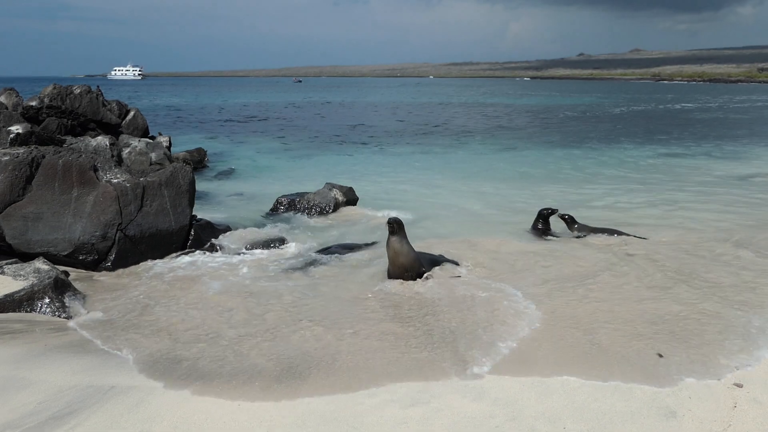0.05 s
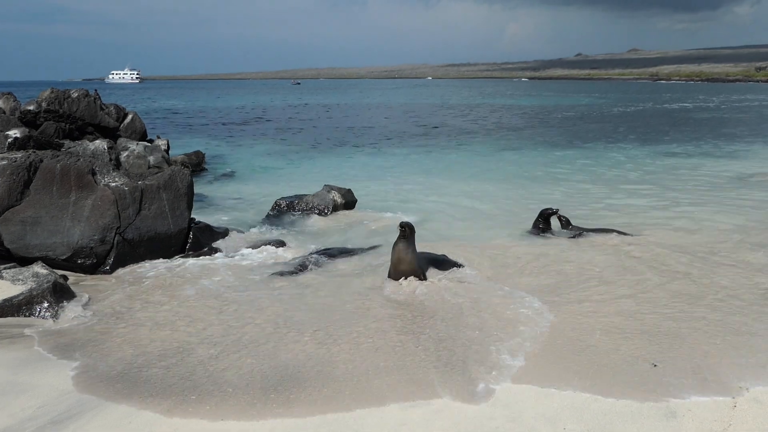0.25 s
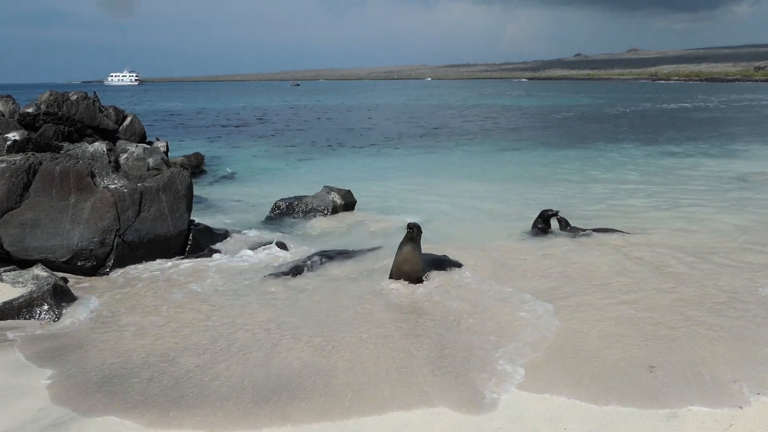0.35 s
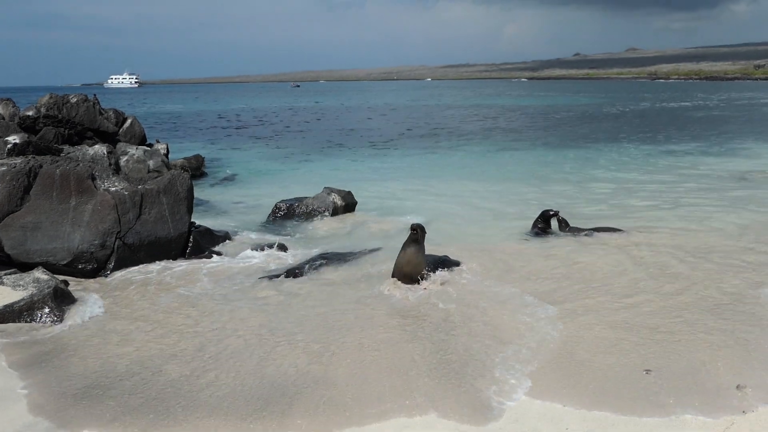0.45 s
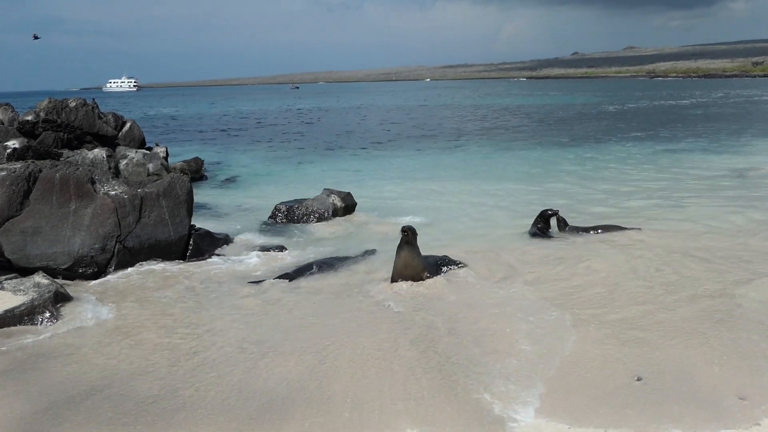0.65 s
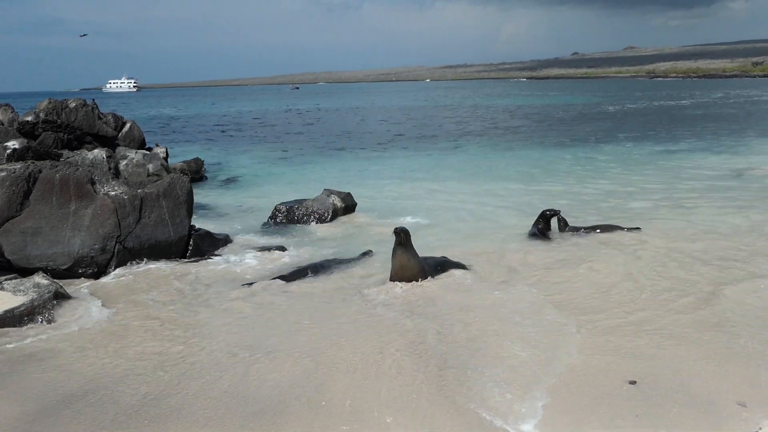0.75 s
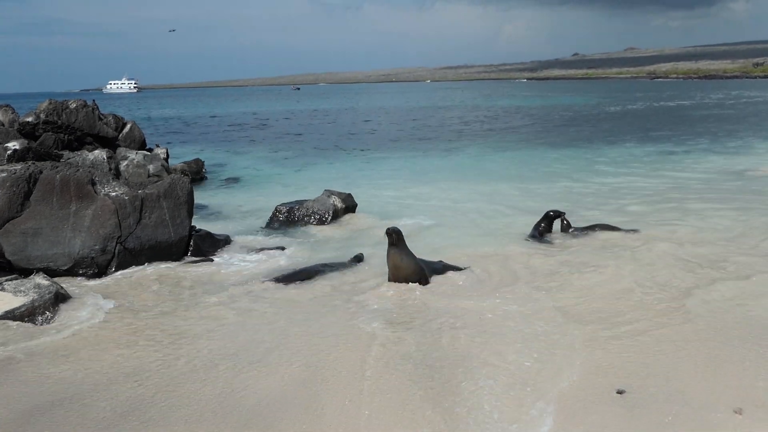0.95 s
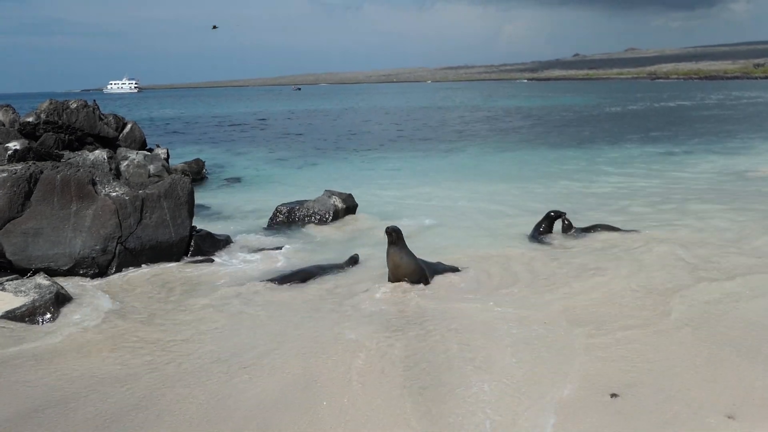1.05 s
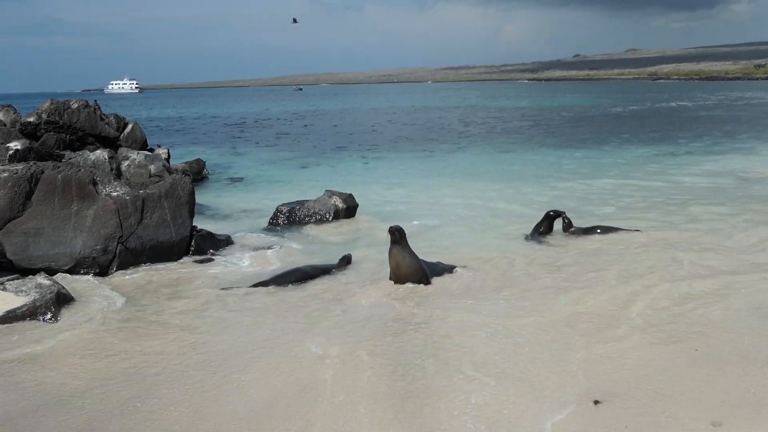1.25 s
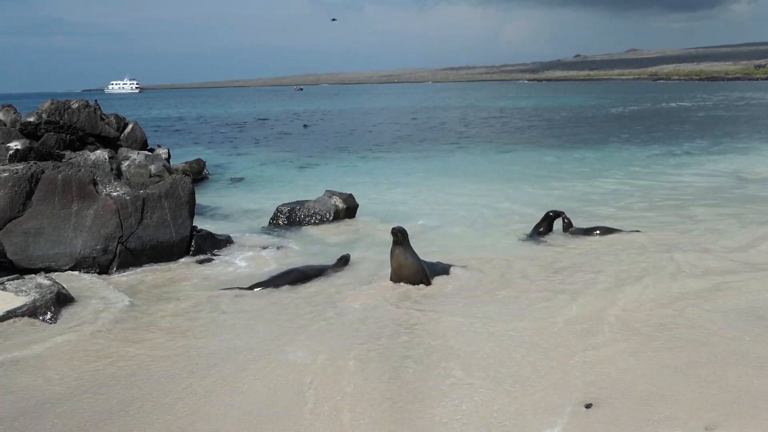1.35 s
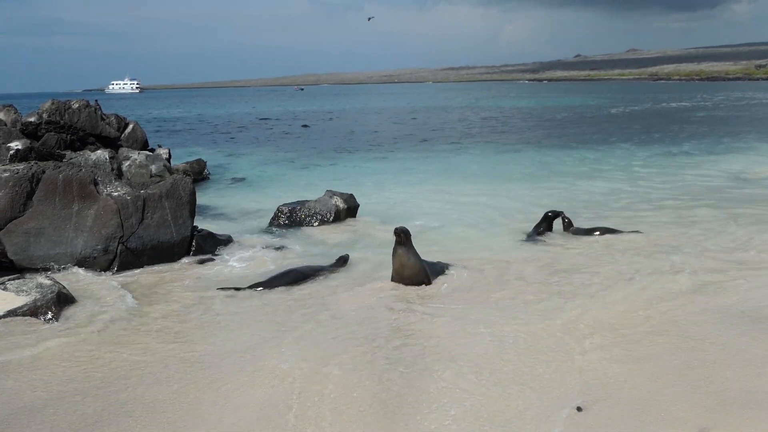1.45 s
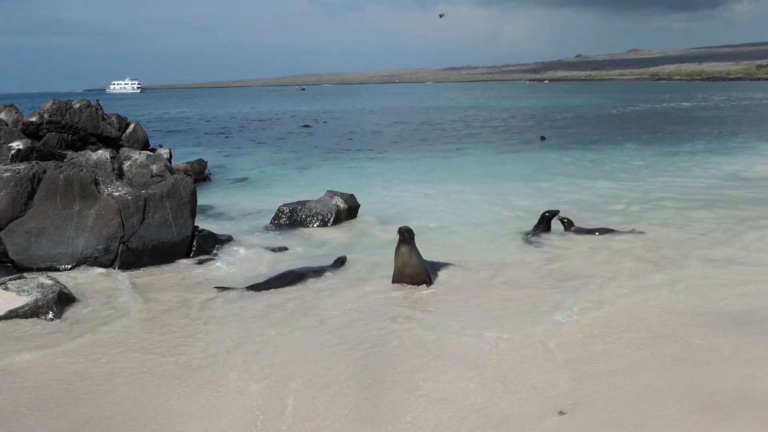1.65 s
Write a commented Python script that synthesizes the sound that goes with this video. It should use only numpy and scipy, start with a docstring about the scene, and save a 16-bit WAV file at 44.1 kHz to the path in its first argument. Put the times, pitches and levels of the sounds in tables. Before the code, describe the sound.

A sea lion growls close by, starting abruptly at about 0.2 s: low, rough, uneven throat rattling that swells into a short bark peaking near 0.7 s, sagging in pitch and ending by 0.87 s, with dull quick echoes. A faint distant moan follows until 1.15 s. Small waves wash steadily throughout; soft hollow laps come from about 0.97 to 1.4 s, with a tiny droplet chirp and thin spray hiss near 1.1 s.

```python
"""A beach, with a sea lion near a camera microphone that starts abruptly.
The animal growls, as uneven noisy slaps of its folds ring in its throat, and the growl swells into
a short bark of wavering tones that sags in pitch. A faint far moan follows; dull echoes answer the voice.
Small waves wash over the sand throughout, as flickering bands of noise. Water laps among the rocks,
one drop chirps upward and spray hisses in a narrow band."""
import sys
import numpy as np
from scipy import signal
from scipy.io import wavfile
from scipy.ndimage import uniform_filter1d

SR = 44100
rng = np.random.default_rng(int(sys.argv[2]) if len(sys.argv) > 2 else 0)


def invert_db(level):
    """Linear amplitude ratio for a level in decibels (20 dB per decade), elementwise."""
    return 10 ** (np.asarray(level, dtype=float) / 20)


def digitize_waveform(pressure):
    """Quantize a signal to 16-bit integers and store it at the path in sys.argv[1].

    Rows of a 2-D input are taken as channels; values are limited to [-1, 1].
    """
    field = np.atleast_2d(pressure).T
    bounded = np.clip(field, -1, 1)
    quanta = np.round(bounded * 32767).astype(np.int16)
    wavfile.write(sys.argv[1], SR, quanta)


N = 74970   # samples

# Growl over time: time_s, level_db, brightness_db_per_octave, chest_db (extra on the low resonances)
GROWL = [(.19, -46, 5.5, 12), (.22, -35, 0.5, -4), (.26, -40.5, 2.5, 5.5), (.32, -30.5, -3.5, -5.5),
         (.35, -42, 7, 9.5), (.42, -35.5, 0.5, 2), (.47, -31.5, 2, -3), (.51, -31.5, 1.5, -2.5),
         (.58, -30, 0.5, -1), (.64, -26.5, 1.5, -2.5), (.68, -21.5, 0.5, -7), (.725, -19.5, -4, -7),
         (.74, -27.5, 1.5, -12), (.77, -24, -10, -6.5), (.8, -31.5, -0.5, 0), (.825, -35.5, -5, 1),
         (.86, -44, -1, 0)]
# Motion of the folds: time_s, rate_slaps_per_s, timing_spread_periods, strength_spread_db,
# roughness_0_to_1 (share of noise), alternation_db (up on one slap, down on the next)
FOLDS = [(.19, 130, .16, 2, .55, 2), (.3, 133, .08, 1.5, .45, 5), (.4, 136, .18, 2, .6, 1),
         (.63, 150, .2, 2, .62, 0), (.665, 190, .2, 1.8, .62, 0), (.69, 141, .06, 1.2, .45, 0),
         (.728, 135, .03, 1, .3, 0), (.75, 112, .03, 1, .25, 0), (.86, 98, .06, 1.5, .35, 0)]
# Throat resonances: centre_hz, width_hz, level_db, left_minus_right_db
THROAT = [(290, 110, -1.5, -0.5), (576, 99, 0, 3), (859, 71, -6, -0.5), (1319, 151, -2, -1.5),
          (1563, 202, -8, -0.5), (2080, 350, -17, -2), (2577, 380, -6.5, 0.5), (3160, 284, -8.5, -1),
          (4085, 355, -12.5, 1), (5590, 880, -38, -1.5)]
# Extra level of the throat resonance near 1.5 kHz: time_s, level_db
MOUTH = [(.19, 8), (.34, 5.5), (.42, 2), (.77, -5.5)]
# Voiced bark: time_s, pitch_hz, level_db
BARK = [(.5, 290, -44), (.59, 294.6, -41), (.63, 303.3, -46), (.655, 285.7, -30.5), (.68, 290.6, -28.5),
        (.695, 284, -25.5), (.72, 269.8, -24.5), (.733, 265.3, -32), (.745, 236.4, -33.5),
        (.76, 233.3, -27.5), (.778, 222.6, -31), (.788, 217, -39), (.8, 214, -27), (.82, 213, -42)]
# Hum inside the growl: time_s, pitch_hz, level_db
HUM = [(.5, 405, -35.5), (.516, 412, -29.5), (.55, 411, -32), (.575, 407.7, -38.5), (.598, 401.4, -31),
       (.63, 421, -33.5), (.655, 418, -26.5), (.676, 473.5, -19.5), (.688, 455, -48), (.745, 480.7, -38),
       (.765, 436, -31), (.79, 418.7, -35)]
# Nearly level upper tone over the sagging bark: time_s, pitch_hz, level_db
RING = [(.655, 578, -31), (.68, 566, -28), (.692, 556, -24), (.72, 553, -25), (.736, 596, -26),
        (.748, 590, -30), (.762, 572, -29), (.775, 558, -29), (.786, 550, -43)]
# Faint far moan: time_s, pitch_hz, level_db
MOAN = [(.83, 288.7, -49), (.87, 299.1, -41.5), (1.0, 321.9, -40.5), (1.03, 306.5, -44), (1.07, 274.7, -47),
        (1.1, 307, -40), (1.15, 290, -56)]
# Echoes off sand and rock: delay_s, left_db, right_db
ECHOES = [(.0031, -44, -16.5), (.0074, -12.5, -50), (.017, -19, -21)]
# Spectrum of the wash: frequency_hz, relative_density_db_per_hz
SURF = [(18, -66), (30, -53), (60, -14), (110, -4), (220, -2), (340, -1), (550, -5), (800, -1), (1250, -11),
        (1600, -9.5), (2600, -8.5), (3600, -13), (4600, -20.5), (6000, -34), (8000, -30), (10000, -30),
        (13000, -23.5), (15800, -38)]
# Loudness of the wash: time_s, level_db
SURF_LEVEL = [(.19, -32), (.5, -29), (.85, -33), (.97, -32.5), (1.03, -33), (1.15, -33), (1.23, -31.5),
              (1.45, -31.5), (1.7, -32.5)]
# Treble over the spectrum of the wash, carrying the animal's breath hiss as it rises during the growl: time_s,
# level_db, slope_db_per_octave
TREBLE = [(.19, 3.5, -2), (.37, 0.5, 3), (.45, 3.5, 0), (.52, 3, -1), (.62, 6.5, -3), (.67, 8.5, -4),
          (.77, 2.5, -2), (.9, 0.5, -1), (1.07, 1.5, -1), (1.22, 4.5, -3), (1.3, 1, 0), (1.4, 0, -2),
          (1.7, 1.5, 1)]
# Left-right likeness of the wash: frequency_hz, correlation
LIKENESS = [(60, .05), (120, .45), (240, .9), (480, .84), (950, .8), (1890, .87), (3770, .75), (5500, .25),
            (7000, .1), (9000, .4), (15000, .35)]
# Stereo lean of the wash: frequency_hz, left_minus_right_db
LEAN = [(60, -2), (120, -1), (240, 0), (1000, .5), (5000, .3), (8000, -1.2), (15000, -2)]
# Hollow laps of water among the rocks: centre_s, pitch_hz, level_db, length_s (centre to 1/e)
LAPS = [(0.989, 268, -36, 0.0067), (0.965, 663, -35.5, 0.015), (0.966, 940, -39, 0.016),
        (1.038, 1490, -36, 0.013), (1.117, 898, -36, 0.022), (1.142, 730, -38, 0.017),
        (1.166, 182.3, -39, 0.025), (1.281, 1160, -37, 0.011), (1.413, 470, -34, 0.03)]
# Hiss of the spray: time_s, level_db
SPRAY = [(1.08, -73), (1.1, -53), (1.15, -51), (1.23, -58), (1.33, -64)]

SLAP_S = .7283   # one slap falls here before its timing spread; the others follow from the rate
GATE_S = 0.007   # breath noise dies by 1/e in this time after each slap
STEADY_BREATH = .55   # noise that flows between the slaps, against the puffs, at full roughness
FLICKER_DB = 3   # spread of the flicker into each resonance, at full roughness
CHEST_HZ = 1000
EVEN_S, EVEN_SHARE = .035, .5   # averaging time; share of the loudness swings in dB taken out
SWELL_DB, LUMPS_DB = .5, 1.2   # shared and per-band flicker of the wash
TREBLE_HZ, TREBLE_MIDDLE_HZ = 5500, 9500   # where the treble begins; pivot of its slope
PORT_LAG_SAMPLES = 4   # the treble reaches the right microphone port this much earlier
LAP_WIDTH = .13   # width of a lap's first resonance as a share of its pitch
SPRAY_HZ, SPRAY_WIDTH_HZ = 9900, 920
DROP_S, DROP_HZ, DROP_RISE_HZ_PER_S, DROP_DB, DROP_LENGTH_S = 1.092, 9400, 38000, -40.5, 0.0035
NOTCH_HZ, NOTCH_Q = 3003, 7
CUTOFF_HZ = 15950
START_S = .1883   # the sound is switched on here


def rms_one(x):
    """Scale to rms 1."""
    return x / np.sqrt(np.mean(x ** 2) + 1e-20)


def in_time(rows):
    """Columns of a table, after its times, at every sample."""
    s, *columns = np.transpose(rows)
    return [np.interp(np.arange(N) / SR, s, c) for c in columns]


def span(rows, fade_s):
    """Gain 1 inside a table's times, fading to 0 outside."""
    first, last = rows[0][0], rows[-1][0]
    return np.interp(np.arange(N) / SR, [first - fade_s, first, last, last + fade_s], [0, 1, 1, 0])


def at_hz(points, hz):
    """Read a spectrum table on a log frequency axis."""
    table_hz, value = np.transpose(points)
    return np.interp(np.log(hz), np.log(table_hz), value)


def drift(rate_hz):
    """Slow chance of spread 1: noise through two equal low-pass poles at rate_hz."""
    # made at every 40th sample, after 2000 values of settling
    r = np.exp(-80 * np.pi * rate_hz / SR)
    noise = rng.standard_normal(N // 40 + 2002)
    slow = signal.lfilter([1], [1, -2 * r, r * r], noise)[2000:]
    return np.interp(np.arange(N) / 40, np.arange(len(slow)), rms_one(slow))


def resonance(x, hz, width_hz):
    """Two-pole peak of gain 1."""
    r = np.exp(-np.pi * width_hz / SR)
    poles = [1, -2 * r * np.cos(2 * np.pi * hz / SR), r * r]
    return signal.lfilter([(1 - r * r) / 2, 0, (r * r - 1) / 2], poles, x)


def pan(db):
    """Left and right gains, db apart."""
    return invert_db(np.array([[db / 2], [-db / 2]]))


def evened(x):
    """Breath pressure evens the loudness: part of its slow swings is divided out."""
    power = uniform_filter1d(x * x, size=int(EVEN_S * SR)) / np.mean(x * x)
    return x / (np.maximum(power, 0) + 1e-3) ** (EVEN_SHARE / 2)


def folds():
    """Uneven slaps of the folds, each with a dying puff of breath noise, over a steadier breath."""
    rate, jitter, spread_db, rough, step_db = in_time(FOLDS)
    cycles = np.cumsum(rate) / SR
    even = np.flatnonzero(np.diff(np.floor(cycles - cycles[int(SLAP_S * SR)])))
    timing, strength = rng.standard_normal((400, 2))[:len(even)].T
    at = np.clip(even + jitter[even] * timing * SR / rate[even], 0, N - 1).astype(int)
    slap_db = spread_db[at] * strength + step_db[at] * (-1) ** np.arange(len(at))
    slaps = np.zeros(N)
    slaps[at] = invert_db(slap_db) / np.sqrt(rate[at])
    r = np.exp(-1 / (GATE_S * SR))
    puffs = signal.lfilter([np.sqrt(1 - r * r)], [1, -r], slaps + 1e-18)
    breath = (puffs + STEADY_BREATH * rough * np.std(puffs)) * rng.standard_normal(N)
    return np.sqrt(1 - rough) * slaps + np.sqrt(rough) * breath, rough


def growl():
    """The slaps and breath of the folds ring in parallel throat resonances of alternating sign."""
    level_db, tilt_db, chest_db = in_time(GROWL)
    mouth_db, = in_time(MOUTH)
    source, rough = folds()
    middle_hz, middle_width_hz = THROAT[3][:2]
    scale = np.std(resonance(source, middle_hz, middle_width_hz))
    out = 0
    for k, (hz, width_hz, db, pan_db) in enumerate(THROAT):
        flickering = source * invert_db(FLICKER_DB * rough * drift(95))
        ringing = resonance(flickering, hz, width_hz)
        ringing = evened(resonance(ringing, hz, 2.7 * width_hz))
        colour_db = chest_db if hz < CHEST_HZ else tilt_db * np.log2(hz / THROAT[0 + 3][0])
        if k == 4:   # the resonance near 1.5 kHz
            colour_db = colour_db + mouth_db
        out = out + (-1) ** k * ringing * invert_db(db + colour_db) * pan(pan_db)
    return out / scale * invert_db(level_db) * span(GROWL, 0.017)


def tone(rows, waver, flutter_db, pan_db):
    """A sine whose pitch wavers by a share of itself and whose level flutters."""
    hz, level_db = in_time(rows)
    phase = 2 * np.pi * np.cumsum(hz * (1 + waver * drift(28.3))) / SR
    gain = invert_db(level_db + flutter_db * drift(51)) * span(rows, 0.0071)
    return np.sqrt(2) * np.sin(phase) * gain * pan(pan_db)


def beach(x):
    """A few dull echoes off sand and rock, unlike on each side."""
    dull = signal.lfilter([.4], [1, -.6], x.mean(axis=0))
    out = x
    for k, (delay_s, left_db, right_db) in enumerate(ECHOES):
        gains = invert_db(np.array([[left_db], [right_db]]))
        sign = [[1], [(-1) ** k]]   # every second echo is turned over on the right
        out = out + gains * np.roll(dull, int(delay_s * SR)) * sign
    return out


def spray():
    """A rising chirp of one drop, with a narrow fizzing hiss."""
    t = np.arange(N) / SR - DROP_S
    cycles = DROP_HZ * t + DROP_RISE_HZ_PER_S * t * t / 2
    drop = invert_db(DROP_DB) * np.exp(-(t / DROP_LENGTH_S) ** 2) * np.sin(2 * np.pi * cycles)
    hiss = resonance(rng.standard_normal((2, N)), SPRAY_HZ, SPRAY_WIDTH_HZ)
    hiss = resonance(hiss, SPRAY_HZ, SPRAY_WIDTH_HZ)
    fizz_db = in_time(SPRAY)[0] + 2.5 * drift(40)
    return drop + rms_one(hiss) * invert_db(fizz_db) * span(SPRAY, .02)


def laps():
    """Each lap is a soft swell of noise in a hollow of its own pitch."""
    t, out = np.arange(N) / SR, 0
    for centre_s, hz, db, length_s in LAPS:
        hollow = resonance(rng.standard_normal(N), hz, LAP_WIDTH * hz)
        hollow = resonance(hollow, hz, 2 * LAP_WIDTH * hz)
        out = out + invert_db(db) * np.exp(-((t - centre_s) / length_s) ** 2) * rms_one(hollow)
    return out


def surf(patchy_db, lumpy_db):
    """Third-octave bands of wash, each with its own flicker, lean and likeness; the treble bands also carry the
    breath hiss of the growl."""
    out, together, edges = 0, drift(4), 25 * 2 ** np.arange(0, 9.5, 1 / 3)
    white = rng.standard_normal((2, 2, N))   # neighbouring bands use different noise
    treble_db, slope_db = in_time(TREBLE)
    for k, (low, high) in enumerate(zip(edges, edges[1:])):
        band = signal.butter(2, [low, high], "band", fs=SR, output="sos")
        mid, side = signal.sosfilt(band, white[k % 2])
        hz = np.sqrt(low * high)
        is_treble = hz > TREBLE_HZ
        alike = np.clip(at_hz(LIKENESS, hz), -1, 1)
        band_db = at_hz(SURF, hz) + patchy_db * together + lumpy_db * drift(17.0)
        band_db = band_db + is_treble * (treble_db + slope_db * np.log2(hz / TREBLE_MIDDLE_HZ))
        left, right = np.sqrt(1 + alike) * mid + np.sqrt(1 - alike) * side * [[1], [-1]]
        right = np.roll(right, -PORT_LAG_SAMPLES * is_treble)
        out = out + invert_db(band_db) * pan(at_hz(LEAN, hz)) * [left, right]
    # levelled on the second half
    return out / np.std(out[:, N // 2:]) * invert_db(in_time(SURF_LEVEL)[0])


def scene():
    """Sea lion with echoes over surf, laps and spray."""
    bark = tone(BARK, waver=.006, flutter_db=.9, pan_db=.6)
    ring = tone(RING, waver=.018, flutter_db=2, pan_db=1.5)
    moan = tone(MOAN, waver=.025, flutter_db=4.5, pan_db=.2)
    hum = tone(HUM, waver=.007, flutter_db=1.2, pan_db=1.5)
    voice = growl() + bark + ring + moan + hum
    return beach(voice) + surf(SWELL_DB, LUMPS_DB) + laps() + spray()


def top_cut(x):
    """Nothing passes above the cut-off."""
    return signal.sosfilt(signal.butter(12, 16310, fs=SR, output="sos"), x)


def record(dry):
    """The camera microphone: a narrow notch, a cut top and an abrupt start."""
    notched = signal.lfilter(*signal.iirnotch(NOTCH_HZ, NOTCH_Q, SR), dry)
    low_pass = signal.cheby2(24, 70, CUTOFF_HZ, fs=SR, output="sos")
    cut = signal.sosfilt(low_pass, notched)
    started = np.arange(N) >= START_S * SR
    return top_cut(cut * started)


dry = scene()
out = record(dry)
digitize_waveform(out)
```